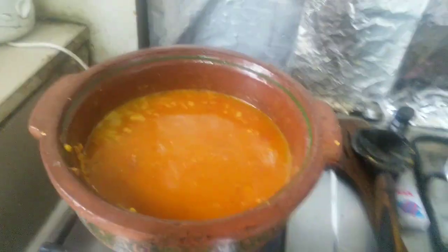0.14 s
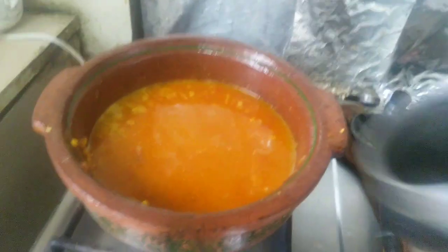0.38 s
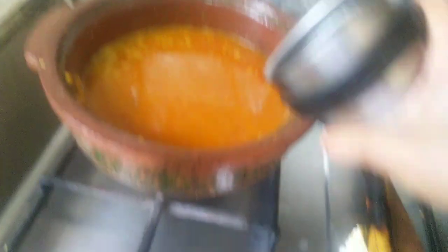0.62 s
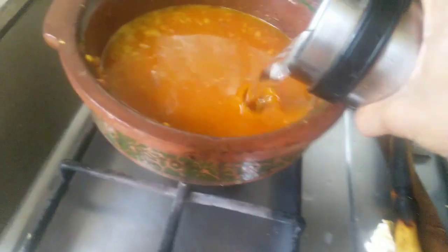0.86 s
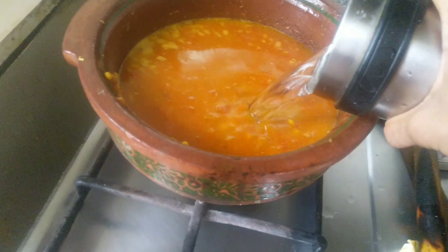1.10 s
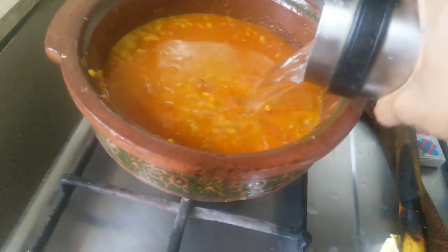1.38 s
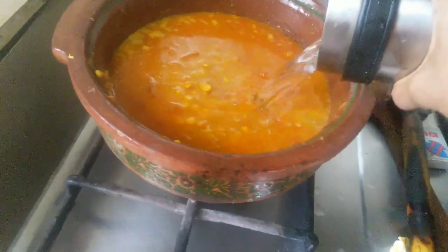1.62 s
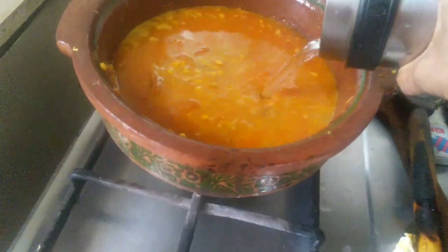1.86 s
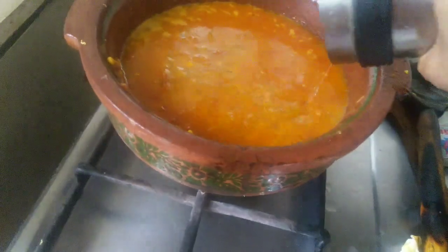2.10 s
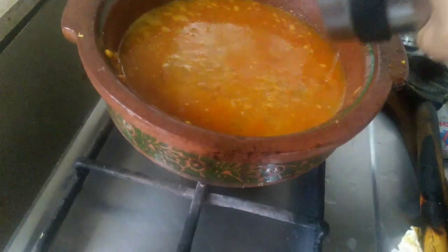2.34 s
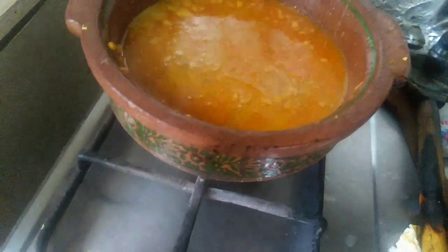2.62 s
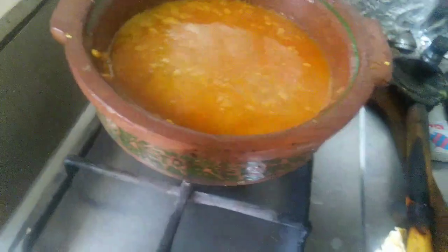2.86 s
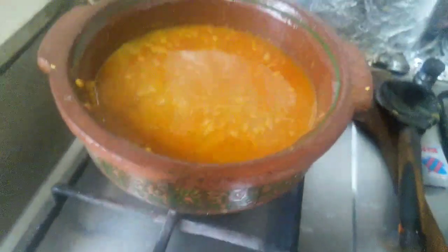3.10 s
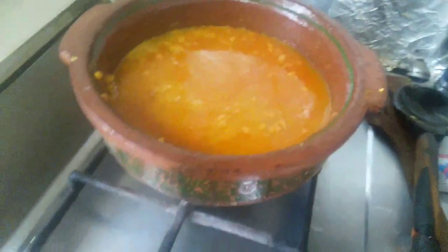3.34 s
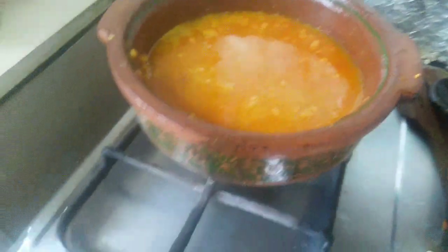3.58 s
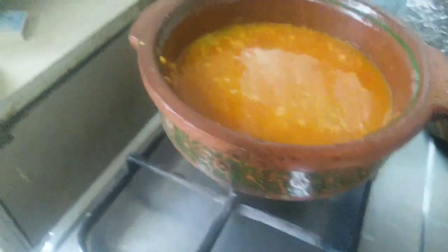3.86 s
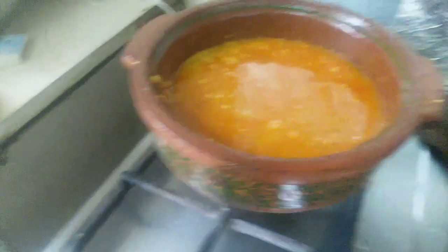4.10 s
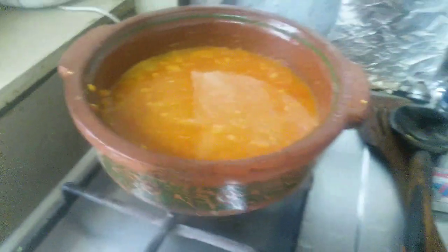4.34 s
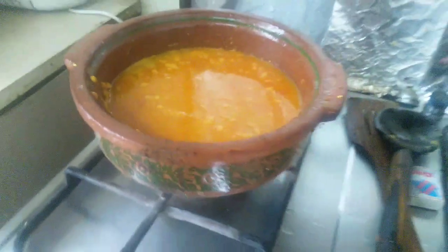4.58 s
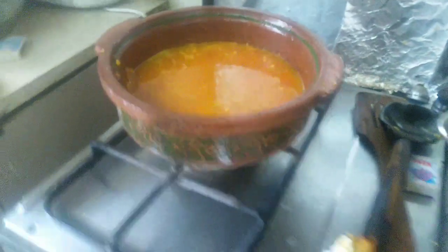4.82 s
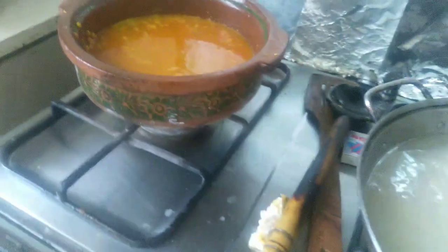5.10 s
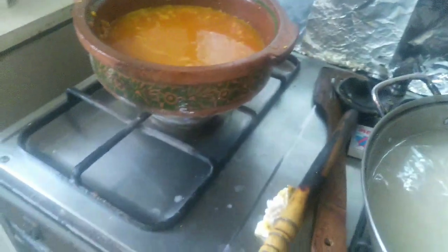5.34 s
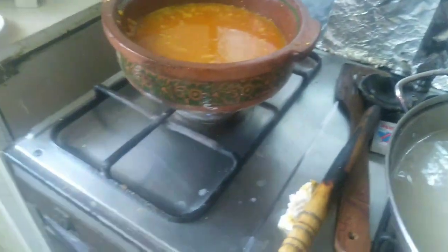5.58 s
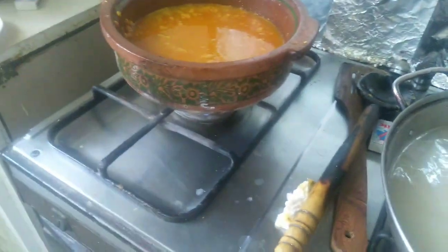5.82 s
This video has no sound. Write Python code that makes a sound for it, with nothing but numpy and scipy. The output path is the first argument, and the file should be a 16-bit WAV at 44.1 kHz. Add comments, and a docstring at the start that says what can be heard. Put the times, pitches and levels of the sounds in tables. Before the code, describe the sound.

In a quiet kitchen, bright splashing opens over a faint fluttering burner rumble, with crisp ringing droplets that thin out. A soft hissing swish swells mid-way. After a lull, a heavy object lands with a boomy, rattling knock amid loud spray, then only faint warbling scraps of noise remain. Mono-like sound, close, muffled at the very top.

```python
"""Water is poured from a steel jug into a clay pot of thin broth on a gas stove: noise through spectra.
A flame rumbles faintly below. Splashes and ticking drops (noise bands, ringing bubbles) open the scene
and thin out; a long swish passes at about 2.5 s. From 4.2 s something heavy is set down with a rattling
knock (excited modes) amid new splashes. Throughout, narrow patches of noise flare and die, as a noise
suppressor leaves of hiss (noise-blurred tones)."""
import sys
import numpy as np
from scipy import signal
from scipy.fft import rfft, irfft, next_fast_len
from scipy.io import wavfile
from scipy.ndimage import uniform_filter1d

SR = 44100
rng = np.random.default_rng(int(sys.argv[2]) if len(sys.argv) > 2 else 0)


def inscribe(sig):
    """Save sig as 16-bit PCM at rate SR to the path in sys.argv[1].

    A 1-D sig is mono; a 2-D sig holds one channel per row.
    Samples are clipped to [-1, 1] before scaling.
    """
    pcm = np.round(np.clip(np.atleast_2d(sig).T, -1, 1) * 32767)
    wavfile.write(sys.argv[1], SR, pcm.astype(np.int16))


def linear_from_db(decibels):
    """Turn decibels (scalar or array-like) into linear amplitude factors; 0 gives 1."""
    return 10 ** (np.asarray(decibels, float) / 20)


N = 262395   # length in samples


def rms_one(x):
    """Normalisation: scale a signal to a root-mean-square value of 1."""
    return x / np.sqrt(np.mean(x ** 2) + 1e-20)


def in_time(rows):
    """Linear interpolation: a curve of (time_s, value) becomes one value per sample."""
    return np.interp(np.arange(N) / SR, *np.transpose(rows))


def band(x, low_hz, high_hz, order=2):
    """Band-pass filtering with a maximally flat (Butterworth) response."""
    return signal.sosfilt(signal.butter(order, [low_hz, high_hz], "band", fs=SR, output="sos"), x)


def drift(rate_hz):
    """Low-pass random process: white noise through a double pole wanders slowly with spread 1."""
    pole = np.exp(-80 * np.pi * rate_hz / SR)   # computed at every 40th sample
    white = rng.standard_normal(N // 40 + 2002)
    slow = signal.lfilter([1], [1, -2 * pole, pole * pole], white)[2000:]
    return np.interp(np.arange(N) / 40, np.arange(len(slow)), rms_one(slow - slow.mean()))


def coloured(x, spectrum):
    """Spectral shaping: weight by (frequency_hz, relative_db), drawn on a log frequency axis; rms 1."""
    size = next_fast_len(N)
    hz = np.maximum(np.arange(size // 2 + 1) * SR / size, 1)
    point_hz, point_db = np.transpose(spectrum)
    gain = linear_from_db(np.interp(np.log(hz), np.log(point_hz), point_db))
    return rms_one(irfft(rfft(x, size) * gain, size)[:N])


def grains(spread_db, rate_hz):
    """Amplitude modulation: white noise whose strength wanders at random in decibels."""
    return rng.standard_normal(N) * linear_from_db(spread_db * drift(rate_hz))


def streaky(x, depth_db):
    """Time-frequency modulation: narrow bands brighten and dim on their own for about 50 ms."""
    cells = signal.stft(x, nperseg=256)[2]
    field = uniform_filter1d(rng.standard_normal(cells.shape), size=16, axis=1)
    return rms_one(signal.istft(cells * linear_from_db(depth_db * rms_one(field)), nperseg=256)[1][:N])


def ring(force, hz, t60):
    """Damped resonance: a unit click sets a sine of height 1 ringing, 60 dB down after t60 seconds."""
    radius = linear_from_db(-60 / (t60 * SR))
    angle = 2 * np.pi * hz / SR
    return signal.lfilter([0, np.sin(angle)], [1, -2 * radius * np.cos(angle), radius * radius],
                          force + 1e-18)


def swells(rows, swell_db=30, fall_bend=1.5):
    """Energy summation: gains of a layer and its partner; rows climb, fall and add as powers."""
    s, rise, fall, db, partner_db = np.transpose(rows)[:, :, None]
    t = np.arange(0, N + 16, 16) / SR
    # a swell gains swell_db in its rise and loses it in its fall;
    # a bend above 1 makes the fall linger at the top, then steepen
    lost = np.maximum(s - t, 0) / rise + (np.maximum(t - s, 0) / fall) ** fall_bend
    power = linear_from_db(db - swell_db * np.minimum(lost, 5)) ** 2
    main = power.sum(axis=0)
    partner = (power * linear_from_db(partner_db) ** 2).sum(axis=0)
    return [np.interp(np.arange(N) / SR, t, np.sqrt(p)) for p in (main, partner)]


def room_tone(level_db=-80):
    """Stationary background noise: a steady, faintly streaky hush of fixed spectrum."""
    # spectrum of the hush: frequency_hz, relative_db (per Hz)
    hush_spectrum = [(24, -30.5), (40, -3.5), (122, -5.5), (339, -8.5), (402, -8), (488, -11.5), (608, -8),
                     (738, -14.5), (1200, -15), (3580, -28), (12400, -27), (13300, -32.5)]
    return linear_from_db(level_db) * coloured(streaky(rng.standard_normal(N), depth_db=2.0), hush_spectrum)


def flame():
    """Band-limited noise: lumpy fluttering low noise and two wavering hollow tones of the burner."""
    # flutters of the flame: peak_s, rise_and_fall_s, level_db, deep_db (deep part against level_db)
    flutter_rows = [(0.02, 0.29, -60.5, -5.5), (0.26, 0.46, -58, -39), (0.44, 0.42, -59, -10),
                    (0.68, .22, -68, -5.5), (0.93, 0.77, -69.5, -7), (1.2, 0.77, -73.5, -1.5),
                    (1.42, 0.28, -62.5, -13), (1.579, 0.51, -66, 0.5), (1.99, 0.1, -59.5, -19),
                    (2.15, 0.16, -60, -13), (2.27, 0.17, -57, -10), (2.42, 0.48, -73, -15),
                    (2.55, 0.27, -66.5, -7), (2.79, 0.16, -67, -7), (3.05, 0.26, -81, -34),
                    (3.31, 0.55, -73, -3), (3.64, 0.11, -72, -21), (3.78, .3, -77, -2.5),
                    (4.059, 0.2, -78, -3.5), (4.9, 0.44, -91, 18), (5.02, 0.16, -74.5, 1),
                    (5.17, 0.13, -86.5, 12), (5.361, 0.14, -76.5, 8.5), (5.502, 0.25, -76.5, -6),
                    (5.62, .14, -84.5, -1), (5.88, 0.26, -89, 5)]
    # hollow tones of the burner: frequency_hz, width_hz, level_db
    hollow_tones = [(410.6, 41, -84), (747, 66, -92)]
    low, deep = swells([(s, length, length, db, deep_db) for s, length, db, deep_db in flutter_rows])
    out = low * rms_one(band(grains(2.8, 16), 95, 153))
    out += deep * rms_one(band(rng.standard_normal(N), 40, 67))
    for hz, width_hz, db in hollow_tones:
        waver = grains(2.5, 3)
        out += linear_from_db(db) * rms_one(band(waver, hz - width_hz / 2, hz + width_hz / 2))
    return out


def random_patches(count=260, top_db=-79.5, spread_db=3.5):
    """Random point process: faint short narrow-band noises flare at random times and pitches."""
    s, length, pitch, level = rng.random((count, 4)).T
    start_s = s ** 1.3 * (N / SR - .01)   # somewhat denser towards the start
    hz = 1300 * 8.0 ** pitch
    level_db = top_db + spread_db * np.log(level)
    return zip(start_s, 0.01 + 0.02 * length, hz, hz, 0.016 * hz, level_db)


def patch_rows():
    """Superposition: start_s, length_s, from_hz, to_hz, width_hz, level_db of every noise patch."""
    # In these tables level_db is the level at the start and length_s the time before the fast fade.
    # patches of steady pitch: start_s, length_s, frequency_hz, width_hz, level_db
    level_rows = [(0.01, 0.089, 1180, 267, -57), (0.197, 0.042, 8450, 620, -53),
                  (0.223, 0.077, 1335, 96, -59), (0.243, 0.07, 1524, 78, -65),
                  (0.252, 0.047, 3840, 112, -71), (0.338, 0.14, 2180, 67, -73),
                  (0.446, 0.051, 864, 135, -67), (0.656, 0.044, 6330, 520, -66),
                  (0.288, .11, 2820, 272, -63.5), (0.319, 0.089, 4170, 1880, -51),
                  (0.446, .11, 177.4, 57, -53.5), (0.459, 0.11, 1311, 285, -41),
                  (0.474, .1, 5780, 1340, -50.5), (0.543, 0.098, 4550, 990, -55.5),
                  (0.561, 0.16, 9900, 200, -65.5), (0.609, 0.083, 1440, 125, -59),
                  (0.61, 0.055, 1100, 135, -61.5), (0.742, 0.043, 2670, 270, -62),
                  (0.746, 0.14, 5300, 256, -63), (0.851, 0.026, 3540, 300, -53.5),
                  (0.856, 0.018, 1470, 137, -59.5), (0.868, 0.053, 2880, 300, -57),
                  (0.963, 0.082, 2205, 515, -63.5), (0.955, 0.1, 4090, 520, -55.5),
                  (0.998, 0.13, 8390, 1410, -62), (1.021, 0.072, 5190, 135, -62),
                  (1.077, 0.12, 717, 118, -69), (1.088, 0.093, 1920, 58, -74.5),
                  (1.142, 0.062, 3660, 180, -71.5), (1.198, 0.036, 3620, 140, -68),
                  (1.238, .036, 9250, 96, -78), (1.243, 0.074, 3670, 141, -68.5),
                  (1.253, .055, 6300, 290, -76), (1.504, .06, 6630, 150, -75.5),
                  (1.562, .05, 5630, 240, -66), (1.563, .1, 1853, 140, -57.5),
                  (1.593, 0.063, 2350, 86, -71.5), (1.61, 0.13, 3080, 79, -75.5),
                  (1.698, .05, 993, 68, -71), (1.709, 0.078, 1540, 66, -66),
                  (1.774, 0.055, 7630, 300, -73.5), (1.775, 0.084, 8780, 300, -74.5),
                  (1.874, .053, 4830, 370, -72), (1.873, 0.013, 2050, 117, -60.5),
                  (1.886, 0.16, 5840, 302, -64), (1.893, 0.09, 9230, 2500, -58.5),
                  (2.004, 0.076, 8600, 3000, -60), (1.945, 0.14, 7140, 1090, -68.5),
                  (1.974, 0.017, 1227, 143, -55), (2.027, .04, 3090, 200, -72),
                  (2.049, 0.13, 1995, 99, -67.5), (2.138, .046, 6680, 1700, -62),
                  (2.141, 0.077, 4676, 376, -61.5), (2.155, 0.069, 7190, 200, -70.5),
                  (2.228, 0.054, 168.6, 58, -49), (2.336, 0.079, 9050, 1500, -71),
                  (2.408, 0.035, 2680, 112, -62), (2.679, 0.049, 2180, 97, -62),
                  (2.698, 0.08, 3330, 725, -56), (2.752, 0.06, 7080, 3000, -71),
                  (2.9, 0.072, 3650, 66.6, -74), (3.156, 0.046, 5360, 128, -75),
                  (3.384, 0.028, 3850, 117, -72), (3.468, 0.039, 8330, 440, -75.5),
                  (3.504, .055, 3070, 79, -73), (3.196, 0.072, 1555, 64, -72.5),
                  (3.382, .039, 8440, 420, -67), (3.447, 0.12, 1920, 59, -67.5),
                  (3.5, 0.058, 3570, 105, -68.5), (3.559, 0.063, 8120, 1090, -58),
                  (3.58, .06, 1950, 97, -74), (3.65, .07, 1960, 97, -67), (3.73, 0.074, 1950, 97, -75.5),
                  (3.657, 0.053, 8980, 222, -65.5), (3.713, 0.15, 3670, 89, -75),
                  (3.807, .093, 2700, 48, -74.5), (3.839, .084, 7440, 282, -75),
                  (3.85, 0.061, 2440, 117, -72), (3.887, 0.076, 8620, 1200, -59),
                  (4.006, 0.079, 2440, 119.8, -58.5), (4.015, .055, 1161, 283, -48),
                  (4.08, 0.087, 8030, 1150, -59.5), (4.103, 0.026, 1085, 360, -64),
                  (4.482, 0.095, 8340, 1020, -37), (4.663, 0.07, 7750, 2500, -61.5),
                  (4.816, 0.022, 8950, 142, -69), (4.945, 0.051, 3170, 253, -57),
                  (4.89, .041, 8250, 111.4, -71.5), (5.019, 0.061, 8440, 104, -76.5),
                  (5.057, 0.023, 3400, 86.5, -70), (5.184, 0.067, 1480, 127, -75.5),
                  (5.228, .047, 1240, 134, -71.5), (5.358, 0.034, 2000, 96, -72.5),
                  (5.665, 0.14, 3190, 150, -69.5), (5.905, 0.0098, 1535, 120, -69),
                  (5.054, 0.032, 1630, 106, -69), (5.074, 0.067, 756, 80, -60),
                  (5.165, 0.12, 737, 39, -58.5), (5.177, 0.048, 6200, 103, -69),
                  (5.28, 0.069, 757, 48.5, -61.5), (5.356, 0.1, 858, 308, -57),
                  (5.358, 0.15, 682, 196, -56), (5.374, 0.048, 1530, 87.5, -67),
                  (5.494, 0.028, 1433, 126, -59.5), (5.534, 0.082, 1860, 97, -67.5),
                  (5.587, 0.076, 1552, 77.7, -65), (5.666, .11, 3584, 150, -62.5),
                  (5.667, 0.079, 1062, 242, -59.5), (5.668, 0.087, 1890, 205, -61),
                  (5.671, .11, 1525, 112, -62), (5.68, 0.048, 606, 97, -56),
                  (5.862, 0.058, 4510, 125.4, -62.5), (5.871, 0.045, 8220, 105, -72)]
    # patches that slide in pitch: start_s, length_s, from_hz, to_hz, level_db
    slide_rows = [(1.982, 0.31, 1146, 1074, -59.5), (2.146, 0.13, 2354, 2530, -59.5)]
    # low hollow patches that all sink a little in pitch: start_s, length_s, level_db
    hollow_rows = [(0.181, 0.085, -59.5), (1.186, 0.1, -66.5), (1.347, .09, -72), (1.416, 0.14, -69.5),
                   (1.705, 0.1, -60.5), (2.16, 0.099, -71), (2.276, .062, -60), (2.339, 0.11, -61),
                   (4.804, 0.036, -61.5), (5.622, 0.038, -64.5)]
    steady = [(s, length, hz, hz, width_hz, db) for s, length, hz, width_hz, db in level_rows]
    slides = [(s, length, from_hz, to_hz, 104, db) for s, length, from_hz, to_hz, db in slide_rows]
    hollow = [(s, length, 425, 410, 22, db) for s, length, db in hollow_rows]
    return [*steady, *slides, *hollow, *random_patches()]


def noise_patches(rise_s=0.0057, sag_db=10.0, fall_db_per_s=300, waver_db=3.2):
    """Quadrature modulation: noise blurs a gliding tone that starts suddenly, sags, then fades fast."""
    out = np.zeros(N)
    white = rng.standard_normal((2, N + 3 * SR))
    waver = linear_from_db(waver_db * drift(40))   # the level of the patches wavers at random
    for k, (s, length, from_hz, to_hz, width_hz, db) in enumerate(patch_rows()):
        at = round(s * SR)
        t = np.arange(min(round((length + .15) * SR), N - at)) / SR
        first = at + 211 * k   # shifts the noise from patch to patch
        source = white[:, first:first + 2000 + len(t)]
        # the noise blurs the tone by its width, and by 70 Hz at least
        blur = signal.butter(3, np.hypot(width_hz, 70) / 2, fs=SR, output="sos")
        in_phase, quadrature = signal.sosfilt(blur, source)[:, 2000:]   # settled part only
        glide_hz = from_hz + (to_hz - from_hz) * np.minimum(t / length, 1)
        phase = 2 * np.pi * np.cumsum(glide_hz) / SR
        tone = rms_one(in_phase * np.cos(phase) + quadrature * np.sin(phase))
        shape_db = db - sag_db * t / length - fall_db_per_s * np.maximum(t - length, 0)
        rise = np.minimum(t / (rise_s + 7.1 / from_hz), 1)   # low tones start more softly
        out[at:at + len(t)] += waver[at:at + len(t)] * tone * linear_from_db(shape_db) * rise
    return out


def knock(contacts_per_s=500, modes_db=0.0):
    """Modal excitation: uneven contacts ring a struck body and boom in the floor, under a noise crash."""
    # the knock and its bounces: peak_s, rise_s, fall_s, crash_db, boom_db (against crash_db)
    bounces = [(4.2, 0.0027, 0.12, -37, 3.5), (4.22, 0.019, .2, -28.5, -4.5), (4.275, 0.054, 0.15, -30, -6),
               (4.333, 0.07, 0.097, -40.5, 9), (4.4, 0.12, .17, -43, 0.5), (4.47, 0.16, 0.13, -46.5, 4),
               (4.55, 0.25, 0.062, -46, -8), (4.61, .08, 0.077, -60.5, 7.5), (4.69, .25, 0.14, -95.5, 36),
               (4.83, 0.01, 0.15, -87.5, 18.5)]
    # spectrum of the crash: frequency_hz, relative_db (per Hz)
    crash_spectrum = [(88, -40), (150, -4.5), (366, -7), (506, -9), (713, -12), (861, -12), (938, -14),
                      (2410, -20), (9000, -50.5), (11700, -65.5), (19800, -120)]
    # modes of the struck body: frequency_hz, relative_db, t60_s
    body_modes = [(239.5, -5.5, 0.1), (297.3, -5.5, 0.33), (445.5, -5, 0.19), (505, 1.5, 0.25),
                  (630, -10.5, 0.21), (865, -8.5, 0.31), (1110, -18, .3), (1386, -10, 0.27)]
    crash_gain, boom_gain = swells(bounces)
    contacts = (rng.random(N) < contacts_per_s / SR) * rng.standard_normal(N)
    crash = coloured(grains(1.1, 40), crash_spectrum)
    body = sum(linear_from_db(db) * rms_one(ring(contacts, hz, t60)) for hz, db, t60 in body_modes)
    boom = rms_one(ring(contacts, 122.8, 0.063)) + 0.33 * rms_one(ring(contacts, 58, 0.87))
    struck = crash + linear_from_db(modes_db) * rms_one(body)
    return crash_gain * struck + boom_gain * rms_one(band(boom, 45, 310))


def drops(cycles=9.0, bubble_db=-4.0, spatter_db=-9.0):
    """Bubble resonance: a tick, a few cycles of a small ringing bubble and a short droplet spatter."""
    # single drops: start_s, tick_peak_db, ring_hz, spatter_t60_s
    drop_rows = [(0.8765, -31.5, 4050, 0.075), (0.9024, -22.5, 6000, 0.03), (0.9174, -29.5, 6200, 0.017),
                 (0.9945, -32, 7750, 0.017), (1.142, -58.5, 9000, 0.014), (1.899, -45, 6400, 0.016),
                 (1.9315, -46, 9640, 0.03), (1.9525, -48, 7950, 0.022), (1.9869, -50, 4340, 0.02),
                 (2.0052, -44, 7500, 0.021), (2.0104, -41, 8500, 0.03), (2.0144, -49, 8300, 0.025),
                 (2.1485, -44, 4700, 0.011), (3.3872, -61, 8200, 0.018), (3.5613, -49, 8800, 0.011),
                 (3.9355, -48.5, 8550, 0.048), (3.996, -46.5, 8800, 0.17)]
    out = np.zeros(N)
    t = np.arange(3000) / SR
    for s, db, hz, t60 in drop_rows:
        at = round(s * SR)
        click = np.zeros(len(t))
        click[:6] = rng.standard_normal(6)
        tick = band(click, 2800, 10500, order=3)
        bubble = ring(click, hz, cycles / hz)   # 60 dB down after this many cycles
        spray_noise = band(rng.standard_normal(len(t)), 0.75 * hz, min(1.16 * hz, 13000))
        spatter = rms_one(spray_noise) * linear_from_db(-60 * t / t60)
        drop = tick / abs(tick).max()
        drop = drop + linear_from_db(bubble_db) * bubble / abs(bubble).max()
        drop = drop + linear_from_db(spatter_db) * spatter
        out[at:at + len(t)] += linear_from_db(db) * drop
    return out


def splash():
    """Turbulent noise: bright spray over a duller slosh, both grainy and streaky."""
    # splashes: peak_s, rise_s, fall_s, spray_db, slosh_db (against spray_db)
    splash_rows = [(0.052, 0.16, 0.19, -44.5, -1.5), (0.21, 0.18, 0.22, -57, -14),
                   (0.321, 0.015, 0.11, -56, -4.5), (0.41, 0.15, 0.16, -58, -19),
                   (0.479, .015, 0.19, -55.5, 5), (0.63, 0.39, 0.084, -61.5, -27),
                   (0.81, 0.12, 0.081, -67, -9), (0.878, .02, 0.14, -48, -10),
                   (0.933, 0.1, 0.13, -53, -11.5), (0.985, .1, 0.14, -61, -2.5),
                   (1.06, 0.17, 0.13, -67, -10), (1.16, .2, 0.21, -77, -11), (1.57, .02, 0.18, -76, -11),
                   (1.778, 0.017, 0.32, -76, -20), (1.895, 0.024, 0.54, -77.5, -2),
                   (2.009, 0.14, .12, -64.5, -4), (2.145, 0.0088, 0.09, -66, -7.5),
                   (3.563, 0.0076, 0.39, -76.5, -11), (3.886, 0.081, 0.12, -62.5, -14.5),
                   (4.017, 0.021, 0.13, -49, -7), (4.05, 0.082, 0.11, -48, -7.5),
                   (4.212, 0.012, 0.24, -42.5, 7.5), (4.275, 0.037, 0.068, -43.5, 7.5),
                   (4.38, 0.11, 0.19, -57, 0.5), (4.493, 0.011, 0.23, -39, -7),
                   (4.575, 0.091, 0.095, -44, -6.5), (4.66, 0.14, 0.092, -58.5, -12),
                   (5.69, 0.039, 0.15, -82, 12.5)]
    # one long swish: time_s, spray_db
    swish_curve = [(2.33, -92), (2.36, -69), (2.406, -61), (2.483, -41.5), (2.583, -39.5), (2.653, -46.5),
                   (2.725, -59), (2.798, -74), (2.83, -88.5)]
    # spectrum of the spray: frequency_hz, relative_db (per Hz)
    spray_spectrum = [(1470, -20.5), (2500, -20.5), (2950, -15.5), (4850, 2), (5340, 0), (8480, 2),
                      (9340, -1.5), (10800, -10.5), (13000, -8.5)]
    # spectrum of the slosh: frequency_hz, relative_db (per Hz)
    slosh_spectrum = [(240, -38.5), (400, -11), (594, -21), (805, -11.5), (1430, -6), (3030, -4.5),
                      (4500, -8), (5850, -10), (9900, -120)]
    trickle_db, trickle_slosh_db = -96, -84.5
    swish_slosh_db, slosh_swing = -43, 1.31   # slosh peak; it swings wider than the spray
    spray_gain, slosh_gain = swells(splash_rows)
    swish_db = in_time(swish_curve)
    swish_slosh = linear_from_db(swish_slosh_db + slosh_swing * (swish_db - swish_db.max()))
    spray_gain = spray_gain + linear_from_db(swish_db) + linear_from_db(trickle_db)
    slosh_gain = slosh_gain + swish_slosh + linear_from_db(trickle_slosh_db)
    spray = coloured(streaky(grains(2.5, 120), depth_db=4.0), spray_spectrum)
    slosh = coloured(streaky(grains(1.5, 60), depth_db=4.0), slosh_spectrum)
    return spray_gain * spray + slosh_gain * slosh


def scene():
    """Linear superposition: all sources sum at one microphone, the same in both channels."""
    mono = room_tone() + flame() + noise_patches() + knock() + drops() + splash()
    return np.stack([mono, mono])


def substitute_noise(x, from_hz=4200, steady_db=7.0, peaky=5.8, share=0.82, crest=5.6):
    """Noise substitution: most steady treble bands are replaced by separate noise in each channel."""
    cells = signal.stft(x, nperseg=2048)[2]
    bands = np.arange(cells.shape[1]) // 32   # 32 bins to a band
    starts = np.arange(0, len(bands), 32)
    power = np.add.reduceat(abs(cells[0]) ** 2, starts) / 32 + 1e-20
    peak = np.maximum.reduceat(abs(cells[0]) ** 2, starts)
    step_db = abs(np.diff(10 * np.log10(power), axis=1, prepend=0))
    change_db = np.maximum(step_db, np.roll(step_db, -1, axis=1))   # to either neighbour in time
    # bands with a strong peak, and frames with a click, stay as they are
    chosen = (change_db < steady_db) & (peak < peaky * power) & (rng.random(power.shape) < share)
    treble = np.pad(band(x[0], 3000, 12000), (1024, 3072))
    frames = treble[:(power.shape[1] + 1) * 1024].reshape(-1, 1024)
    clicky = abs(frames).max(axis=1) > crest * frames.std(axis=1)
    chosen = chosen & ~(clicky[:-1] | clicky[1:])
    chosen = chosen[bands] & (np.arange(len(bands)) * SR / 2048 > from_hz)[:, None]
    noise = signal.stft(rng.standard_normal(x.shape), nperseg=2048)[2]
    noise = noise / np.sqrt(np.mean(abs(noise) ** 2)) * np.sqrt(power[bands])   # same band strength
    return signal.istft(np.where(chosen, noise, cells), nperseg=2048)[1][:, :N]


def roll_off(x):
    """The treble ends steeply here."""
    return signal.sosfilt(signal.butter(12, 14190, fs=SR, output="sos"), x)


def record(dry):
    """Noise substitution and low-pass filtering: steady treble becomes noise, the top is cut."""
    low_pass = signal.cheby2(12, 45, 13700, fs=SR, output="sos")   # 45 dB down from 13.7 kHz
    mix = signal.sosfilt(low_pass, substitute_noise(dry))
    return roll_off(mix)


dry = scene()
out = record(dry)
inscribe(out)
```